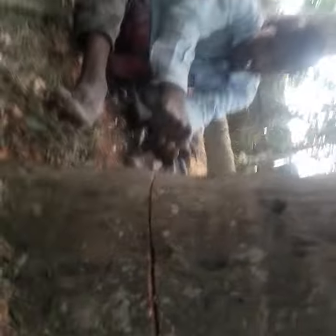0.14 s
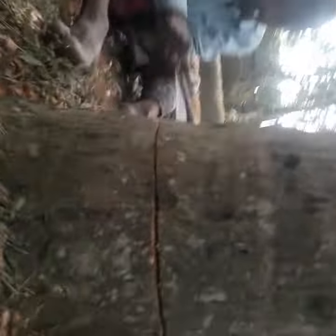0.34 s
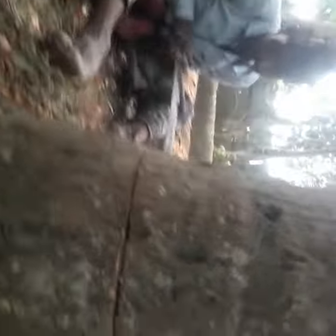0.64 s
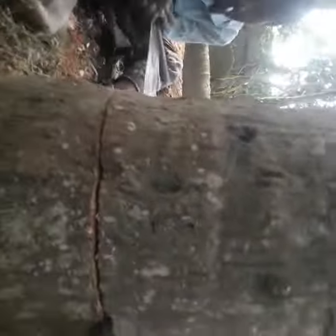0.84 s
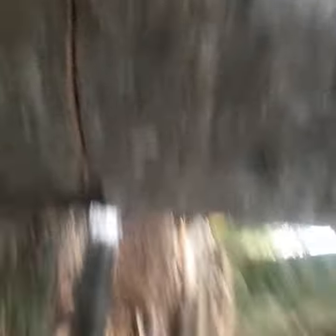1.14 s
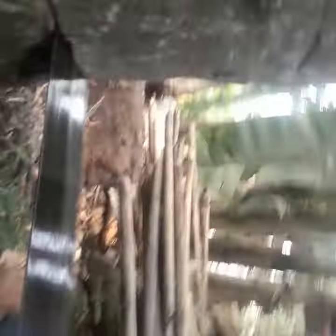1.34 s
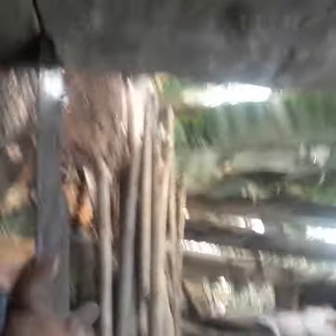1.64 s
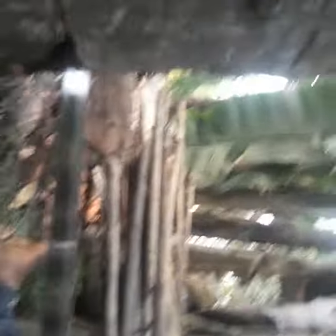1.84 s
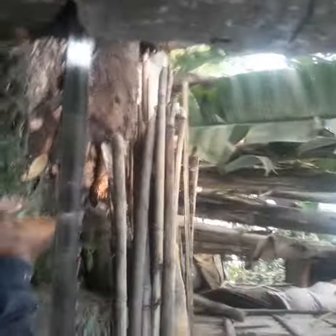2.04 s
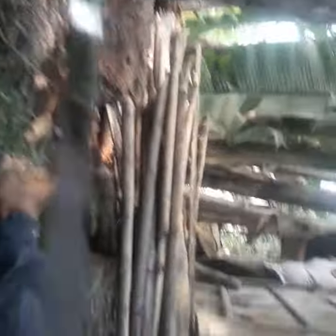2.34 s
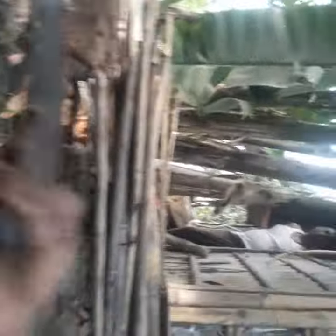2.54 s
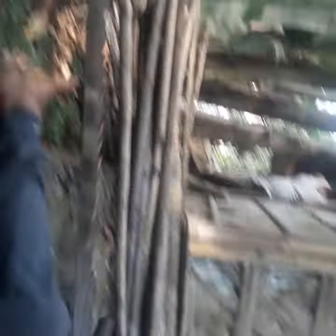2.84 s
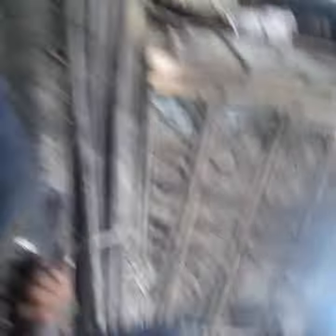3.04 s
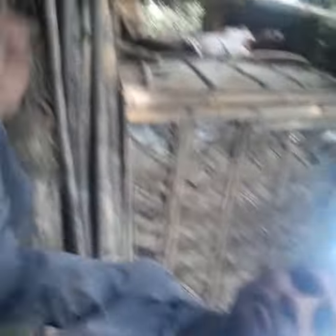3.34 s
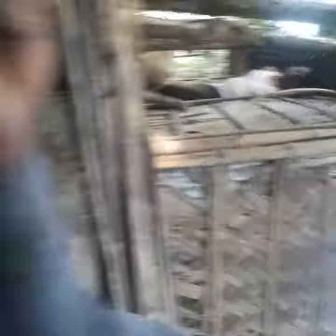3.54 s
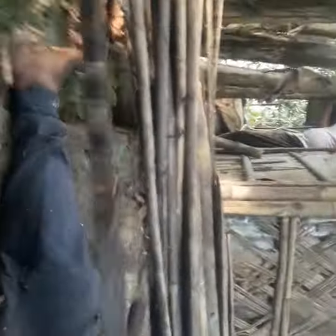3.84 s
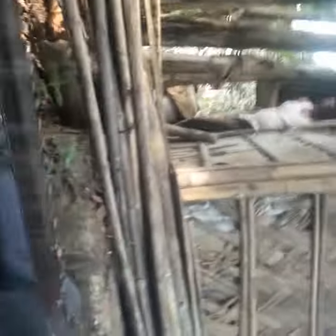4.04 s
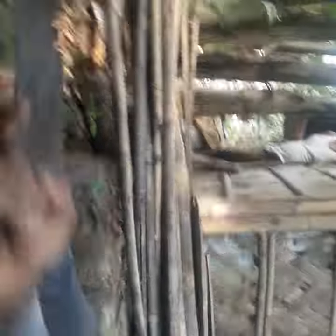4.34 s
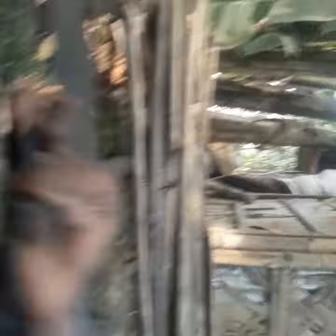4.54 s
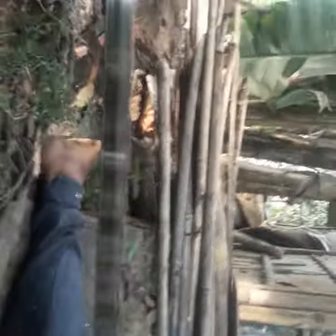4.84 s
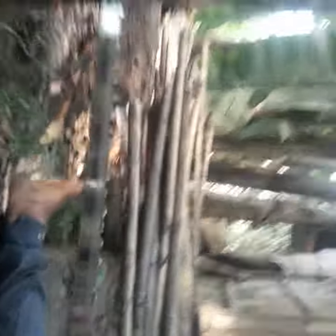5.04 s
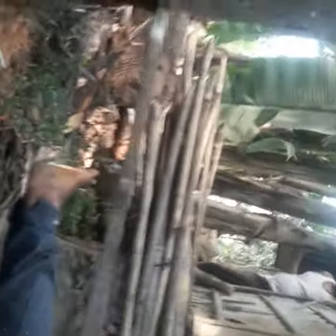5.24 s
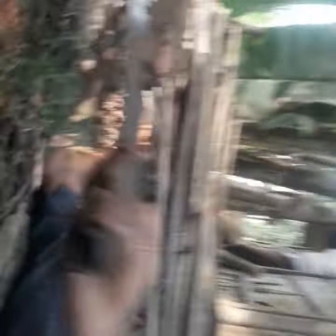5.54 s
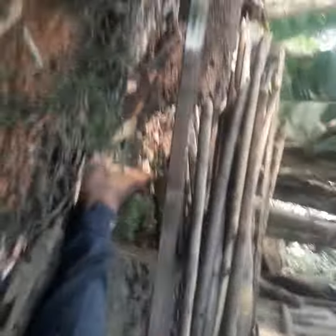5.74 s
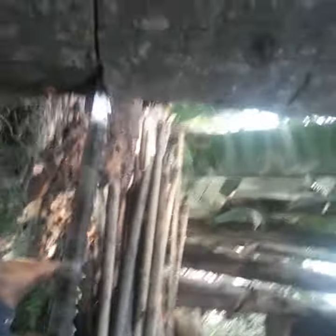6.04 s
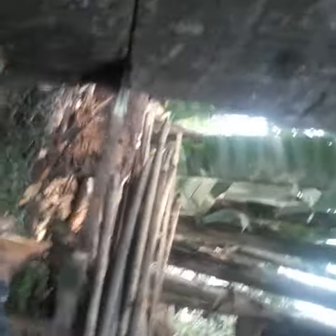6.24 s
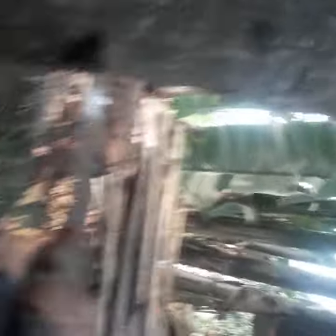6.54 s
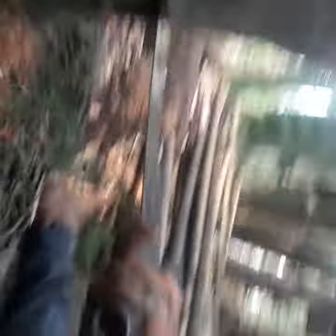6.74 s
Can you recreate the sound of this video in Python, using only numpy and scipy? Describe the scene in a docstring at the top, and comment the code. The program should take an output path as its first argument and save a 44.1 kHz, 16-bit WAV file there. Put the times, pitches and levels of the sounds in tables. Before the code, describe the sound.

In a quiet wooded yard, a long hand saw is already cutting a thick log, heard close up. The first stroke ends near 0.15 s, then pull and push alternate at roughly two a second, with tiny dips at the turns. Each swells into a coarse, hollow rasp with gritty tearing and bright steel hiss. The strokes from 0.15 to 1.1 s are strongest; a low chatter and squeak catch at 0.5 s. Sharp, loud taps of sawdust strike the microphone near 1.55 s. From 1.6 to 3 s sawing is softer, then gradually firmer, with a more resonant cut around 4.4 s. More taps and thumps come at 4.0, 4.6 and 5.0 s, a heavy one at 5.6 s and several from 6.1 s. A final short stroke at 6.55 s ends at 6.7 s with thumps and small ticks over faint blade ring and air.

```python
"""A long hand saw is pulled to and fro through a log by two men, about two strokes a second.
Teeth tear the wood in noisy bursts; filters give them a hollow boom, a rasp and a shrill hiss of steel.
Now and then the blade chatters or squeaks, made from noise through filters and from short tones.
Bits of sawdust tap and thump on the close microphone as short pulses, over the quiet noise of a wooded yard."""
import sys
import numpy as np
from scipy import signal
from scipy.fft import rfft, irfft
from scipy.io import wavfile
from scipy.ndimage import uniform_filter1d

SR = 44100
rng = np.random.default_rng(int(sys.argv[2]) if len(sys.argv) > 2 else 0)


def to_wav(sig):
    """Store sig (one row per channel, or 1-D mono) as 16-bit WAV at the path in sys.argv[1].

    Samples outside -1..1 are clipped; the rate is SR.
    """
    pcm = np.clip(np.atleast_2d(sig), -1, 1) * 32767
    pcm = np.round(pcm).astype(np.int16)
    wavfile.write(sys.argv[1], SR, pcm.T)  # frames by channels


N = 303408
TIME = np.arange(N) / SR
BINS = np.maximum(np.arange(N // 2 + 1) * SR / N, 1)   # frequencies of the spectrum, Hz

# strokes of the blade, pull and push in turn; a skew over 1 makes a stroke fastest late:
# (start [s], end [s], skew [-], force [dB], hollow boom against the force [dB], steel hiss against the force [dB],
#  shrill scrape against the hiss [dB], fine sizzle against the hiss [dB])
STROKES = [(-0.242, 0.139, 1.28, -27.5, -0.5, 0, -5, 4.5), (0.146, 0.605, 1.13, -23, 0.5, -4, -3, 7),
           (0.646, 1.099, 1.16, -22.5, -1, -2.6, -2, 6), (1.136, 1.587, 0.95, -26, 3.5, 0.2, -5, 5),
           (1.586, 2.031, 1.16, -28, -0.8, 0.2, -4, -1), (2.109, 2.534, 0.9, -28, 2, -2.5, -4, 2.5),
           (2.587, 3.057, 0.94, -29.5, 2, -3.5, 1.5, 1.5), (3.08, 3.509, 1.16, -26, 1, -6, -1.5, 5),
           (3.538, 4.034, 0.89, -28, -0.6, -3.5, 1.5, 2.5), (4.046, 4.475, 1.15, -25, 2, -6, 4, 7.5),
           (4.533, 5.026, 0.99, -26, 1, -1.5, 3, 4), (5.03, 5.462, 1.27, -23.5, 0.5, -6.5, 1.5, 4),
           (5.54, 5.992, 0.95, -24, -1.8, -2.4, 1.5, 1.5), (6.028, 6.488, 1.236, -24.5, 1.5, -6.5, 0, 5.5),
           (6.553, 6.7, 1.85, -25, -4.5, 3, 1.5, -7.5)]
# broad colour of the rasp: (frequency [Hz], relative level [dB])
RASP_COLOUR = [(50, -34), (120, -8), (250, -4.5), (380, -2), (520, 5.5), (780, 4.5), (1020, -2), (1400, 0),
               (2200, -2), (4200, -7.5), (5600, -15.5), (8200, -35.5), (11500, -27), (16000, -30.5)]
# resonances of the blade in its cut: (frequency [Hz], width [Hz], lift [dB])
BLADE_MODES = [(1280, 145, 9.5), (1580, 60, 5), (2697, 110, 3.5), (3282, 49, 9), (3740, 52, 5.5),
               (4630, 36, 7), (9620, 80, 7), (11800, 39, 8.5), (13700, 57, 10)]
# the blade catches and one mode sings: (time [s], pitch [Hz], peak before a shared trim [dB], length [s])
CATCHES = [(0.514, 3290, -18.5, 0.0066), (0.522, 648, -9, 0.007), (0.553, 650, -13, 0.0037),
           (0.912, 3290, -22, .012), (1.385, 650, -10.5, 0.013), (0.111, 2900, -24, 0.0057),
           (1.45, 3264, -15, 0.0043), (1.535, 3280, -26, 0.0075), (2.45, 650, -14, 0.0064),
           (2.486, 634, -18, 0.0082), (2.895, 645, -14.5, 0.012), (3.33, 650, -14, 0.011),
           (3.88, 1290, -24, 0.0097), (3.939, 1250, -23, 0.0058), (4.407, 632.8, -15, 0.0099),
           (4.527, 740, -48, 0.03), (4.6, 3310, -28.5, 0.0086), (5.415, 651, -16, 0.01),
           (5.631, 3304, -25, 0.0074), (5.668, 3280, -18, .014), (6.026, 6473, -54, 0.034),
           (6.397, 650, -13, 0.012), (6.652, 2535, -20, 0.011)]
# sawdust landing on the microphone: (time [s], peak before a shared trim [dB], fading time of the push [ms])
CRUMBS = [(1.03, -9.5, 0.45), (1.553, 8, 0.1), (1.5549, 3, 0.12), (1.5569, -3.5, 0.17), (2.149, -18, 0.2),
          (2.532, -27, 0.31), (2.811, -13, 1.7), (3.9895, -7.5, 0.5), (3.998, -22, 0.77), (4.070, -8, 0.13),
          (4.592, -5.5, 0.15), (4.632, 0.5, 0.15), (4.653, -2.5, 1.44), (4.976, -9, 0.77),
          (5.002, -9, 0.32), (5.098, -4.5, 0.83), (5.602, 6.5, 0.59), (5.974, -17.5, 1.21),
          (6.098, 1.5, 0.25), (6.1012, 0.5, 0.69), (6.154, -13.5, 1.47), (6.296, -1, 0.67),
          (6.6211, 0, 1.16), (6.707, -10, 0.6), (6.716, -17.5, 1.15), (6.733, -26, 1.5),
          (6.775, -14.5, 2.4), (6.782, -23, 2.8), (6.79, -13, 0.33)]
# colour of the still air of the yard: (frequency [Hz], relative level [dB])
YARD_COLOUR = [(25, -34), (60, 1), (150, 3), (350, -5), (750, -11), (1050, -13.5), (1800, -13),
               (3800, -24.5), (5500, -28.5), (8200, -50), (12000, -37), (16000, -35)]
# single teeth rip through hard grain: (time [s], centre [Hz], level before a shared trim [dB], length [s])
SCRATCHES = [(0.958, 1260, -19, .035), (1.366, 3850, -21, 0.0046), (1.371, 1348, -15.5, 0.04),
             (1.413, 3900, -10, 0.0036), (2.143, 3950, -38, 0.014), (2.358, 937, -22, 0.019),
             (2.768, 5350, -47, 0.074), (2.977, 4300, -30.5, 0.013), (3.336, 4496, -27.5, 0.0042),
             (3.454, 4500, -24.5, .010), (3.594, 4550, -30.5, 0.0044), (4.745, 4240, -19, 0.0064),
             (4.785, 4270, -22.5, 0.028), (4.896, 4190, -14.5, 0.0021), (4.925, 4150, -25, 0.0094),
             (4.929, 1240, -24.5, 0.024), (6.416, 5944, -41, 0.033)]
# borders between boom, rasp, hiss, scrape and sizzle: (frequency [Hz])
BAND_EDGES_HZ = [900, 2500, 4300, 7800]
# the long blade rings on faintly: (frequency [Hz], width [Hz], level [dB])
FREE_MODES = [(176, 18, -9), (675, 4, -27), (760, 4.5, -2), (1588, 8.7, -23), (3350, 9, -16)]
# the microphone moves around the log:
# (time [s], resonance of the cut heard from there [Hz], its strength [gain], low rumble of the trunk [dB])
STANDPOINT = [(0, 2170, 1.5, -2), (1.2, 2220, 1.1, -2.5), (2.3, 2129, 0.67, -1), (2.9, 1652, 0.73, -1),
              (4.4, 1700, 3.1, 0.5), (5.7, 1626, .8, -1), (6.3, 1750, 1.13, -2), (6.7, 2393, 0.68, 10)]
# the teeth dig into hard grain and the whole rasp swells: (time [s], swell [dB])
DIGS = [(0.51, 5), (0.765, 4), (1.392, 2), (1.84, 0), (2.802, 1.5), (3.331, 3.5), (3.699, 4), (3.79, 3.5),
        (3.881, 4), (4.645, 1.5), (4.8, 1), (5.79, 2), (5.931, 7.5), (6.39, 3)]

# the men lean in: change from start to end of a stroke (dB on a pull, dB on a push)
BOOM_LEAN_DB, RASP_LEAN_DB, HISS_LEAN_DB, SIZZLE_LEAN_DB = (6, 4.5), (5.5, 1), (2, 7), (8, -7)
DIG_S = 0.018
BOOM_KNEE = 0.75   # share of full speed above which the boom levels off
SIZZLE_POWER, SIZZLE_FLUTTER_DB = 0.2, 1.65   # the sizzle needs more speed than the hiss, and flutters more
CHATTER_HZ, CHATTER_WIDTH_HZ = 649.5, 49.3
YARD_DB = -50.5
CUTOFF_HZ = 15900


def from_db(db):
    """Turn decibels into a gain."""
    return 10 ** (np.asarray(db) / 20)


def rms_one(x):
    """Scale a sound to an average power of 1."""
    return x / np.sqrt(np.mean(x ** 2) + 1e-20)


def running_rms(x, size):
    """Strength of a sound around each moment, over a window of size samples."""
    return np.sqrt(uniform_filter1d(x ** 2, size=size))


def in_time(rows):
    """Join the points of each column with straight lines, one value per sample."""
    seconds, *columns = np.transpose(rows)
    return [np.interp(TIME, seconds, column) for column in columns]


def colour(points):
    """Gain at every frequency, drawn through a few points."""
    hz, db = np.transpose(points)
    return from_db(np.interp(np.log(BINS), np.log(hz), db))


def drift(rate):
    """Random wandering of typical size 1, with a new target rate times a second."""
    knots = rng.standard_normal(4096)
    return rms_one(np.interp(TIME * rate, np.arange(len(knots)), knots))


def hump(seconds, centre, length):
    """Smooth rise and fall around one moment."""
    return np.exp(-((seconds - centre) / length) ** 2)


def resonate(x, hz, width_hz):
    """One resonance: it passes its own pitch at gain 1 and weakens the rest."""
    r = np.exp(-np.pi * width_hz / SR)
    feedback = [1, -2 * r * np.cos(2 * np.pi * hz / SR), r * r]
    return signal.lfilter(np.array([1, 0, -1]) * (1 - r * r) / 2, feedback, x)


def yard_air():
    """The still yard is soft coloured noise whose level wanders slowly."""
    noise = irfft(rfft(rng.standard_normal(N)) * colour(YARD_COLOUR), N)
    return from_db(YARD_DB + 3.2 * drift(4.2)) * rms_one(noise)


def yard_echo(x, t60=0.28, dull_hz=3000, size=22050):
    """Trees and hut walls scatter back a short, dull tail that drops 60 dB in t60 seconds."""
    tail = rng.standard_normal(size) * from_db(-60 * TIME[:size] / t60)
    tail = signal.sosfilt(signal.butter(1, dull_hz, fs=SR, output="sos"), tail)
    return signal.fftconvolve(x, tail / np.sqrt(np.sum(tail ** 2)))[:N]


def crumbs(port_hz=125, level_db=-7.0, rebound=1.04, tick_ms=0.1, tick_db=-7,
           swing=0.1, swing_hz=140, swing_width_hz=140, size=2048):
    """A crumb ticks, presses and rebounds, fast if hard and slowly if soft; the microphone swings back."""
    out, ms = np.zeros(N + size), np.arange(size) / SR * 1000
    port = signal.butter(2, port_hz, "high", fs=SR, output="sos")   # takes away the lowest bass
    for s, db, contact_ms in CRUMBS:
        push, tick = [np.sin(rebound * ms / d) * np.exp(-ms / d) for d in (contact_ms, tick_ms)]
        tick_share = np.minimum(contact_ms, 1 / contact_ms)   # largest for a push of 1 ms
        pulse = signal.sosfilt(port, push - from_db(tick_db) * tick_share * tick)
        pulse = pulse + swing * resonate(pulse, swing_hz, swing_width_hz)
        at = round(s * SR)
        out[at:at + size] += from_db(db + level_db) * pulse / np.abs(pulse).max()
    return out[:N]


def blade_ring(sawing):
    """The sawing sets off narrow resonances of the long blade, which ring on faintly."""
    return sum(from_db(db) * resonate(sawing, hz, width) for hz, width, db in FREE_MODES)


def scratches(width_share=0.19, level_db=-4.5):
    """A tooth ripping through hard grain gives a short burst of noise, wider in pitch the shriller it is."""
    out = np.zeros(N)
    for s, hz, db, length in SCRATCHES:
        near = np.abs(TIME - s) < .15
        noise = rng.standard_normal(near.sum())
        width_hz = width_share * hz
        rip = rms_one(resonate(resonate(noise, hz, width_hz), hz, width_hz))
        out[near] += from_db(db + level_db) * hump(TIME[near], s, length) * rip
    return out


def catches(level_db=-2.5, waver=0.025):
    """Sticking and slipping makes one mode of the blade sing briefly, as a slightly wavering tone."""
    out, wobble = np.zeros(N), np.cumsum(1 + waver * drift(200)) / SR
    for s, hz, db, length in CATCHES:
        near = np.abs(TIME - s) < .1
        tone = np.sin(2 * np.pi * hz * wobble[near])
        out[near] += from_db(db + level_db) * hump(TIME[near], s, length) * tone
    return out


def stroke_state():
    """At every sample: the number of the latest stroke and how far it has got, 0-1."""
    start, end = np.transpose(STROKES)[:2]
    k = np.maximum(np.searchsorted(start, TIME) - 1, 0)
    return k, np.clip((TIME - start[k]) / (end - start)[k], 0, 1)


def stroke_levels():
    """Force, boom, hiss, scrape and sizzle of each stroke in dB, changing smoothly at the turns."""
    k, _ = stroke_state()
    return uniform_filter1d(np.transpose(STROKES)[3:, k], size=1500)


def lean(rise_db):
    """Pressure changes evenly along a stroke, by one amount on a pull and another on a push; dB."""
    k, progress = stroke_state()
    return uniform_filter1d(np.array(rise_db)[k % 2] * (progress - .5), size=1500)


def digs():
    """Short swells of force where the teeth dig in; dB."""
    out = np.zeros(N)
    for at, swell_db in DIGS:
        near = np.abs(TIME - at) < .1
        out[near] += swell_db * hump(TIME[near], at, DIG_S)
    return out


def blade_speed(creep=.04):
    """Each stroke speeds up and slows to the turn, where the blade still creeps; about 1 at its fastest."""
    k, progress = stroke_state()
    skew = np.transpose(STROKES)[2, k]
    swing = np.sin(np.pi * progress ** skew)
    return np.hypot(uniform_filter1d(swing, size=1100), creep * (TIME < STROKES[-1][1]))


def tooth_bites(speed, teeth_per_s=150, uneven_db=1.0, tear_s=0.0076, rub=1.0):
    """Teeth enter the wood at a rate set by the speed and tear for a moment; a slow blade mostly rubs."""
    passed = np.cumsum(teeth_per_s * speed * from_db(2.5 * drift(90))) / SR
    new_tooth = np.diff(np.floor(passed), prepend=0)
    bites = new_tooth * from_db(uneven_db * np.clip(rng.standard_normal(N), -2, 2))
    tearing = signal.lfilter([1], [1, -np.exp(-1 / (tear_s * SR))], bites + 1e-18)
    load = rub + speed * rms_one(tearing)
    return load / running_rms(load, 2600)


def fibres(load, snaps_per_s=5000, size_db=0.5, friction=0.57):
    """Fibres snap in a dense crackle, mixed with friction noise, both following the load on the teeth."""
    sizes = from_db(size_db * np.minimum(rng.exponential(1, N), 4)) * rng.choice([-1, 1], N)
    snaps = rms_one(sizes * (rng.random(N) < snaps_per_s / SR))
    return load * rms_one(snaps + friction * rng.standard_normal(N))


def sliding_modes(force, width_hz=60, lift=1.07, change_per_s=32, glide=.02, count=46):
    """The free length of the blade keeps changing, so its many weak modes swell, fade and slide in pitch."""
    pitches = np.geomspace(900, 15500, count) * (1 + 0.0094 * rng.standard_normal(count))
    widths = width_hz * np.maximum(1, pitches / 3000)   # high modes are damped more
    modes = sum(resonate(force, hz, width) * drift(change_per_s) for hz, width in zip(pitches, widths))
    # reading the modes a little early or late bends their pitch
    bend = signal.lfilter([1 / SR], [1, -np.exp(-5 / SR)], glide * drift(12))
    return force + lift * np.interp(TIME + bend, TIME, modes)


def from_standpoint(x, width_hz=420, trunk_hz=190, trunk_width_hz=220):
    """One broad resonance of the cut moves with the microphone, and the trunk rumbles more or less."""
    hz, lift, trunk_db = in_time(STANDPOINT)
    # shift the moving pitch down to zero, keep what lies near it, and shift it back up
    turn, r = np.exp(2j * np.pi * np.cumsum(hz) / SR), np.exp(-np.pi * width_hz / SR)
    peak = 2 * np.real(turn * signal.lfilter([1 - r], [1, -r], x / turn))
    rumble = (from_db(trunk_db) - 1) * resonate(x, trunk_hz, trunk_width_hz)
    return x + lift * peak + rumble


def chatter(force, firmness=.7):
    """Stick and slip keeps the main mode going, and friction limits how far it swings."""
    narrow = resonate(force, CHATTER_HZ, CHATTER_WIDTH_HZ)
    swing = rms_one(resonate(narrow, CHATTER_HZ, 4 * CHATTER_WIDTH_HZ))
    power = uniform_filter1d(swing ** 2, size=200)
    return rms_one(swing / (power + 0.25) ** (firmness / 2))


def split_bands(spectrum, flicker_db):
    """Split the rasp into five pitch ranges, each flickering by itself."""
    below = [0] + [1 / (1 + (BINS / hz) ** 10) for hz in BAND_EDGES_HZ] + [1]
    return [irfft(spectrum * (high - low), N) * from_db(flicker_db * drift(80))
            for low, high in zip(below, below[1:])]


def saw(speed, boom_db=0.32, rasp_db=-1.2, hiss_db=-0.3, chatter_db=-4.0, boom_power=1.96, rasp_power=1.82,
        hiss_power=1.324, flicker_db=0.04, grain_db=1.77, grain_per_s=70):
    """Tearing drives blade and cut; hiss starts first, the boom needs a fast blade and then levels off."""
    force_db, hollow_db, bright_db, scrape_db, sizzle_db = stroke_levels()
    force = sliding_modes(fibres(tooth_bites(speed)))
    ringing = force + sum((from_db(db) - 1) * resonate(force, hz, width) for hz, width, db in BLADE_MODES)
    spectrum = rfft(from_standpoint(ringing)) * colour(RASP_COLOUR)
    wood, rasp, hiss, scrape, sizzle = split_bands(spectrum, flicker_db)

    boom = rms_one(wood) + from_db(chatter_db) * chatter(force)
    sizzle_level_db = sizzle_db + lean(SIZZLE_LEAN_DB) + SIZZLE_FLUTTER_DB * drift(70)
    fine = sizzle * speed ** SIZZLE_POWER * from_db(sizzle_level_db)
    steel = hiss + scrape * from_db(scrape_db) + fine

    boom_drive = np.tanh((speed / BOOM_KNEE) ** boom_power)
    parts = ((boom, boom_db + hollow_db + lean(BOOM_LEAN_DB), boom_drive),
             (rasp, rasp_db + lean(RASP_LEAN_DB), speed ** rasp_power),
             (steel, hiss_db + bright_db + lean(HISS_LEAN_DB), speed ** hiss_power))
    out = 0
    for part, db, drive in parts:
        steady = part / running_rms(part, 2200)   # the arms keep the mean pressure steady
        out = out + steady * from_db(db) * drive
    # hard and soft grain make the whole rasp stutter
    return out * from_db(force_db + digs() + grain_db * drift(grain_per_s))


def scene(echo_db=-27):
    """Saw, its ring and echo, falling sawdust and the quiet yard."""
    sawing = saw(blade_speed()) + catches() + scratches()
    echo = from_db(echo_db) * yard_echo(sawing)
    return (sawing + blade_ring(sawing) + echo + crumbs() + yard_air())[None]


def record(dry):
    """Peaks are cut off at full scale, then the highest treble is removed steeply."""
    steep = signal.ellip(10, .1, 80, CUTOFF_HZ, fs=SR, output="sos")
    return signal.sosfilt(steep, np.clip(dry, -1, 1))


dry = scene()
out = record(dry)
to_wav(out)
```